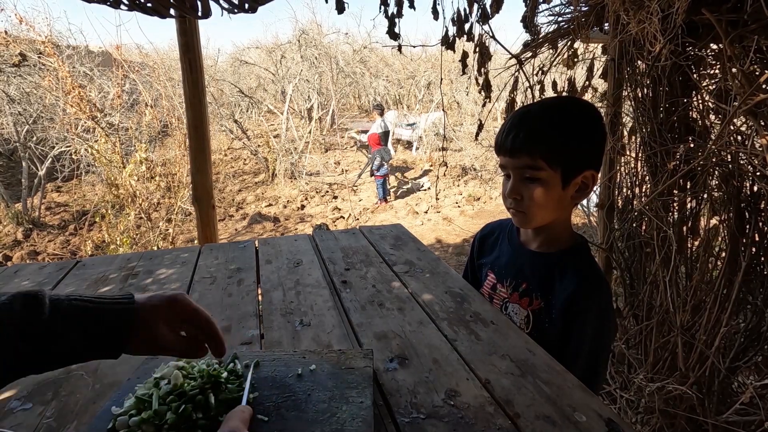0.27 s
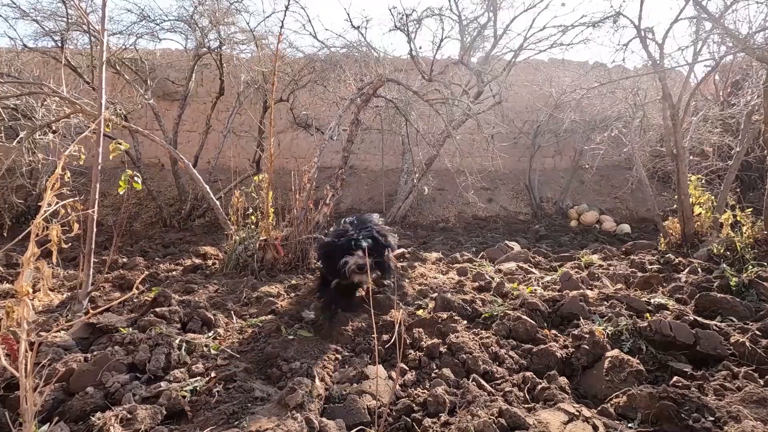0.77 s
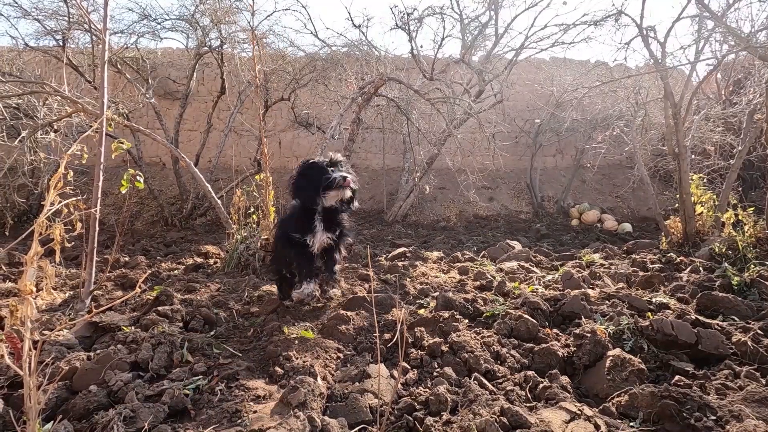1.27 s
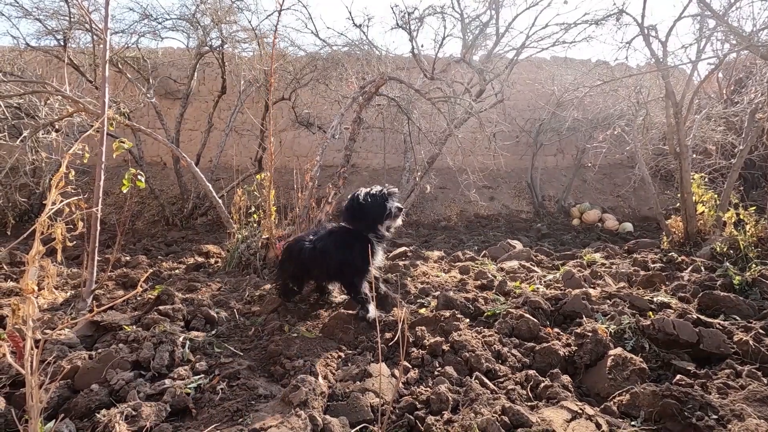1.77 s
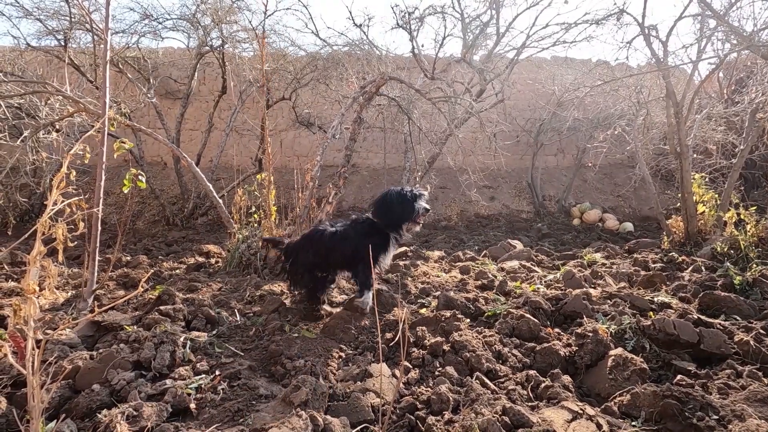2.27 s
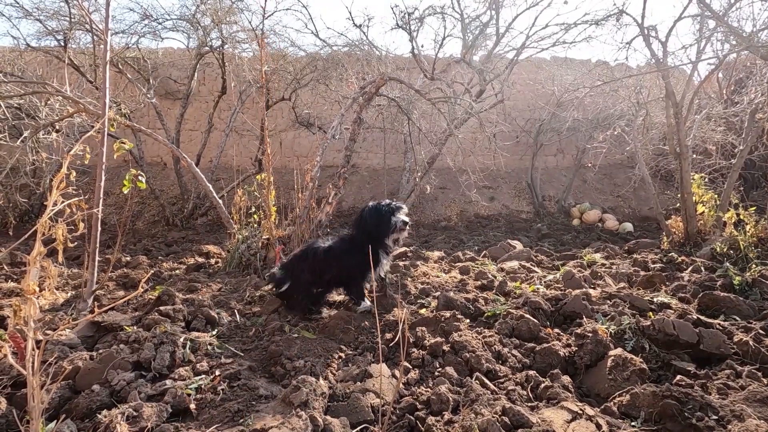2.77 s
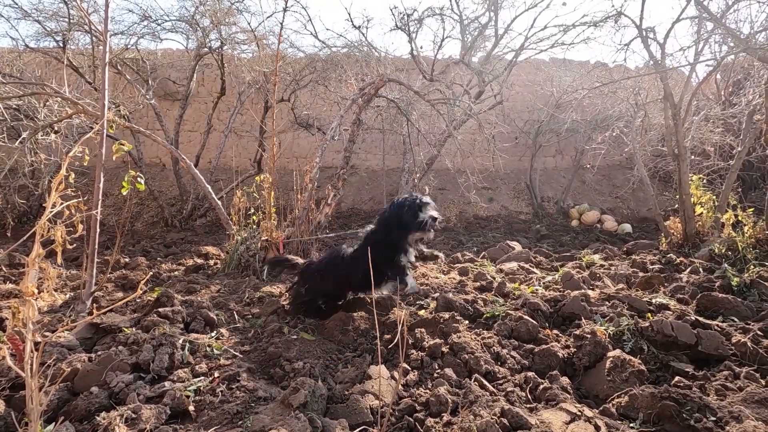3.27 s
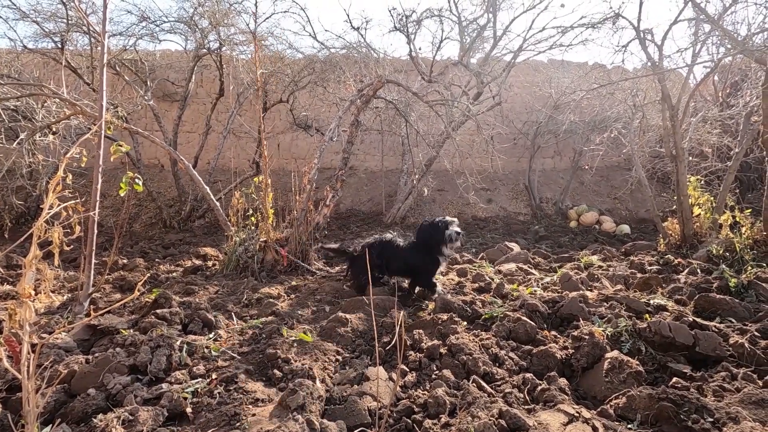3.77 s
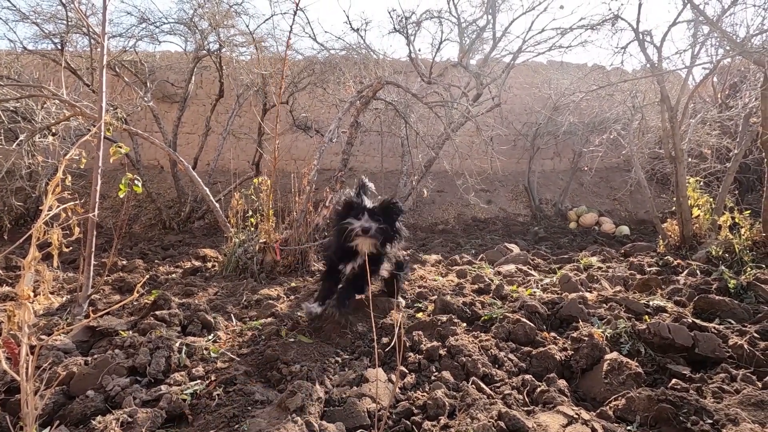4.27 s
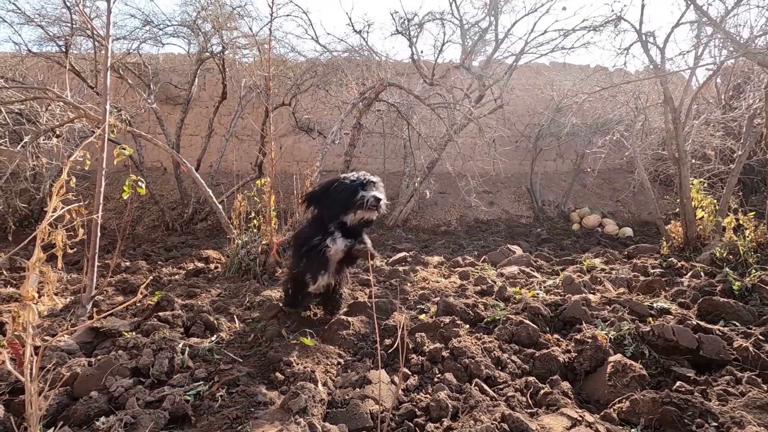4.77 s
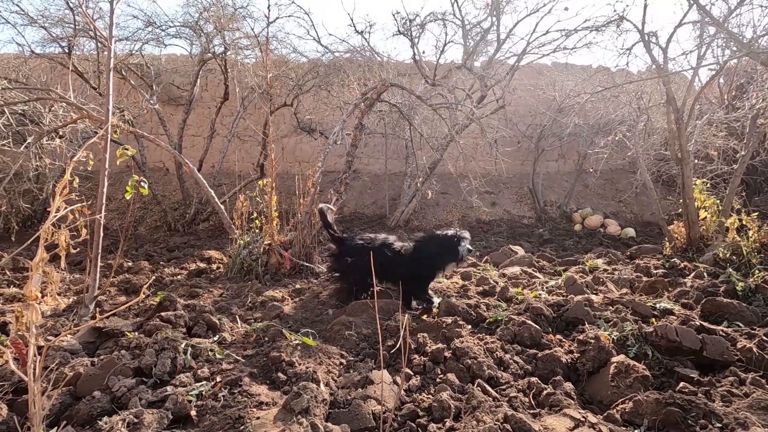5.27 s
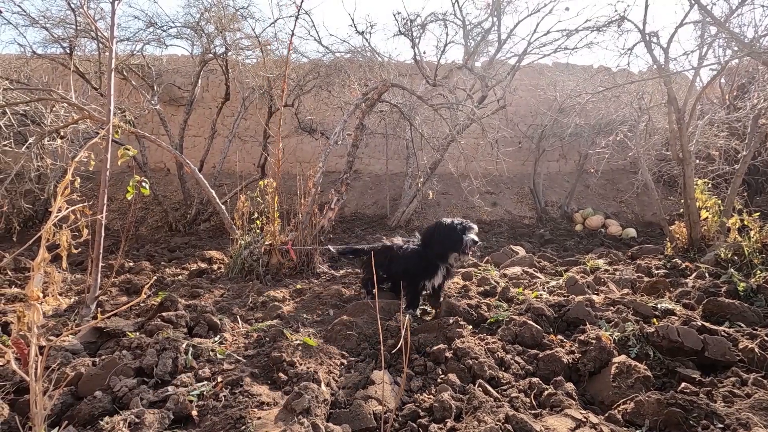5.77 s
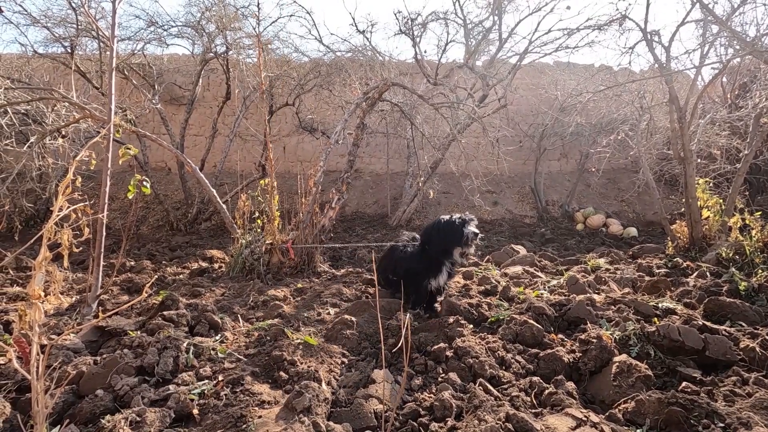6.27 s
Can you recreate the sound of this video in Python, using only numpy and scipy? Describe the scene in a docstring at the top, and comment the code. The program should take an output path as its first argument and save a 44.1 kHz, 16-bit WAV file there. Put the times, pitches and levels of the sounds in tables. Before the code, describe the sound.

Soft knife knocks and a short scrape in rumbling wind, a cut to silence, then a little dog whining, panting and yelping in short cries.

```python
"""In the wind outdoors a knife is laid on a cutting board: noise blows and a grainy slide ring its modes.
After a short silence, in a walled orchard, a small leashed dog whines, yips and pants: gliding partials
filtered by the mouth, sine whistles and hoots, grumbling pulses, a low decaying growl, and noise shaped
by throat and teeth. A dying noise response gives a faint echo; ticks are short noise decays; wind
rumbling on the microphone ports and the orchard's rustle are coloured noise."""
import sys
import numpy as np
from scipy import signal
from scipy.fft import rfft, irfft
from scipy.io import wavfile
from scipy.ndimage import uniform_filter1d

SR = 44100
rng = np.random.default_rng(int(sys.argv[2]) if len(sys.argv) > 2 else 0)


def waveform_to_disk(signal):
    """Save audio, clipped to [-1, 1], as 16-bit WAV at the path in sys.argv[1]."""
    frames = np.transpose(np.atleast_2d(signal))
    scaled = np.clip(frames, -1, 1) * 32767
    samples = np.round(scaled).astype(np.int16)
    wavfile.write(sys.argv[1], SR, samples)


N = 287532

CUTOFF_HZ = 15600
# Wind strength, one track for the knife and one for the dog. Each row: time in seconds, level in dB.
WIND = [
    [(0, -51), (.3, -44.5), (.752, -47)],
    [(.83, -86.5), (1.1, -69), (1.7, -66.5), (2.5, -64), (3.1, -54.5), (3.3, -57.5), (3.7, -68),
     (3.85, -53.5), (4.1, -60.5), (4.7, -51), (5.1, -54.5), (5.5, -51), (6.52, -55)],
]


def amp(db):
    """Decibel law: the amplitude ratio of a level in dB."""
    return 10 ** (np.asarray(db) / 20)


def rms_one(x):
    """Power normalisation: the whole array is scaled to a joint rms of 1."""
    return x / np.sqrt(np.mean(x ** 2) + 1e-20)


def in_time(rows):
    """Linear interpolation: each column after the time becomes one value per sample."""
    s, *columns = np.transpose(rows)
    return [np.interp(np.arange(N) / SR, s, c) for c in columns]


def at_hz(points, hz):
    """Spectral envelope: levels in dB interpolated along logarithmic frequency."""
    points = np.array(points)
    return np.interp(np.log(hz), np.log(points[:, 0]), points[:, 1])


def gate(start, stop, edge_s):
    """Time window: one between the two times, with linear ramps outside."""
    return np.interp(np.arange(N) / SR, [start - edge_s, start, stop, stop + edge_s], [0, 1, 1, 0])


def drift(rate, count=1):
    """Random modulation: noise through a double low-pass pole at the rate in Hz, scaled to a joint rms of 1."""
    r = np.exp(-2 * np.pi * rate / SR)
    noise = rng.standard_normal((count, N + SR))
    return rms_one(signal.lfilter([1], [1, -2 * r, r * r], noise))[:, SR:]


def resonate(x, hz, width):
    """Damped resonance: a two-pole filter of about unit peak gain, its width in Hz."""
    r = np.exp(-np.pi * width / SR)
    poles = [1, -2 * r * np.cos(2 * np.pi * hz / SR), r * r]
    return signal.lfilter([(1 - r * r) / 2, 0, (r * r - 1) / 2], poles, x)


def coloured(spectrum, count):
    """Spectral shaping: white noise weighted by a spectrum, with a joint rms of 1."""
    hz = np.maximum(np.fft.rfftfreq(N, 1 / SR), 1)
    white = rfft(rng.standard_normal((count, N)))
    return rms_one(irfft(white * amp(at_hz(spectrum, hz)), N))


def spread(pair, side_db):
    """Mid-side stereo: the side signal enters left and right with opposite signs."""
    return pair[0] + amp(side_db) * pair[1] * [[1], [-1]]


def bursts(events, length_s):
    """Impulsive excitation: each event starts noise that decays by 1/e in the given length."""
    out, t = np.zeros(N), np.arange(int(0.016 * SR)) / SR
    noise = rng.standard_normal((len(events), len(t)))
    for row, burst in zip(events, noise):
        at = int(row[0] * SR)
        out[at:at + len(t)] += amp(row[1]) * burst * np.exp(-t / length_s)
    return out


def glide(rows, waver, edge_s):
    """Frequency modulation: phase integrates a smoothed, wavering pitch; edges and other columns follow."""
    s, hz, *columns = np.transpose(rows)
    a, b = int((s[0] - edge_s) * SR), int((s[-1] + edge_s) * SR)
    t = np.arange(a, b) / SR
    pitch = uniform_filter1d(np.interp(t, s, hz), size=300) * (1 + waver[a:b])
    phase = 2 * np.pi * np.cumsum(pitch) / SR
    edge = np.interp(t, [t[0], s[0], s[-1], t[-1]], [0, 1, 1, 0]) ** 2
    return slice(a, b), pitch, phase, edge, [np.interp(t, s, c) for c in columns]


def cries():
    """Source and filter: 16 harmonics take the colour of nose, mouth and tongue; also returns the level."""
    # Voice tracks. Each row: time in seconds, pitch in Hz, level in dB, mouth opening from 0 to 1.
    cry_tracks = [
        [(0.85, 1200, -65.5, 0.24), (0.871, 1223, -52.5, 0.24), (0.886, 1157, -59.5, 0.3),
         (0.896, 1130, -68, 0)],
        [(1.028, 865, -45.5, 0.51), (1.052, 848, -43, 0.31), (1.073, 900, -47, 0.51), (1.087, 974, -57.5, .1)],
        [(1.302, 1493, -54, 1), (1.31, 1340, -43.5, 0.72), (1.323, 1331, -43, 0.86), (1.344, 1273, -54, 0.8),
         (1.354, 1270, -56, 0)],
        [(1.706, 1610, -51.5, 0.4), (1.714, 1477, -40.5, 0.47), (1.729, 1274, -41.5, 0.6),
         (1.75, 1226, -45.5, 0), (1.761, 1090, -53, .1)],
        [(1.842, 584, -51.5, 0), (1.86, 639, -39.5, 0), (1.877, 536, -60, 0.12), (1.904, 485, -65, 0.15)],
        [(2.128, 619, -63, 0.04), (2.158, 536, -54, 0.05), (2.169, 470, -66, 0.25), (2.191, 423, -65, 0.06)],
        [(2.592, 892, -48.5, 0.51), (2.615, 1030, -39, 0.54), (2.631, 1047, -48, 0.87),
         (2.653, 963, -43.5, 0.16), (2.676, 990, -41, 0.48), (2.695, 922, -41.5, 0.13),
         (2.77, 1047, -43.5, 0.5), (2.835, 1068, -40, 0.5), (2.884, 1050, -37.5, 0.54), (2.897, 1004, -39, 0.5)],
        [(3.089, 633, -16, 0.56), (3.11, 626, -15.5, 0.7), (3.129, 739, -16, 0.83), (3.149, 778, -16, 0.6),
         (3.165, 767.4, -13, 0.76), (3.177, 783, -22, 0.6), (3.191, 787, -30.5, 0.01)],
        [(3.523, 1326, -25.5, 0.52), (3.533, 1005, -25.5, 1), (3.55, 1038, -19, 1), (3.568, 1249, -19.5, 0.99),
         (3.592, 1175, -26.5, 0.9), (3.611, 940, -39, 0.5), (3.619, 960, -40.5, 0.75)],
        [(3.797, 1128, -34.5, 0.66), (3.812, 849, -33.5, 0.75), (3.819, 1002, -22.5, 1),
         (3.83, 1149, -19.5, 0.9), (3.843, 1183, -17.5, 0.75), (3.86, 1116, -25.5, 0.52),
         (3.876, 905, -35.5, 0.62)],
        [(4.117, 809, -35.5, 0.44), (4.135, 815, -34.5, 0.37), (4.149, 991, -38.5, 0.54),
         (4.17, 925, -28.5, 0.85), (4.177, 947, -42.5, 0.24)],
        [(4.349, 1181, -29.5, 0.83), (4.357, 1208, -22, 0.64), (4.391, 1297, -16.5, 0.56),
         (4.399, 1225, -23.5, 0.52), (4.424, 1145, -32.5, 0.4)],
        [(4.427, 796, -40.5, .3), (4.445, 766, -41, 0.5)],
        [(4.449, 1076, -30.5, 0.47), (4.466, 1107, -37.5, 0.48), (4.481, 1008, -35.5, 0.45),
         (4.493, 1070, -32.5, 0.02), (4.512, 1048, -30.5, 0.44), (4.535, 923, -44, 0.13)],
        [(4.707, 1205, -38.5, 0.26), (4.725, 1086, -36.5, 0.5), (4.74, 1177, -32.5, 0.66),
         (4.756, 1116, -32.5, 0.41), (4.776, 1104, -30, 0.37), (4.809, 986, -33, 0.2), (4.821, 909, -41, 0)],
        [(4.952, 1212, -23, 0.4), (4.97, 1224, -17.5, 0.68), (4.982, 1115, -21, 0.88), (4.994, 1083, -15, 0.98),
         (5.009, 997, -25, 0.46), (5.017, 922, -30.5, 0.56)],
        [(5.205, 1200, -19.5, .3), (5.229, 1169, -16, 0.46), (5.241, 1034, -24, 0.29),
         (5.255, 1006, -25.5, 0.51), (5.262, 970, -36, 0.1)],
        [(5.267, 650, -33.5, 0.13), (5.274, 607, -35.5, 0.36), (5.287, 537, -51, 0.3)],
        [(5.425, 661.5, -37.5, 0.54), (5.437, 698.5, -31.5, 0.33), (5.457, 708, -27, 0.46),
         (5.469, 736, -26.5, 0.27), (5.479, 783.5, -30, 0.21), (5.49, 666, -29, 0.62)],
        [(5.494, 508, -36, 0.13), (5.504, 528, -45.5, 0.13), (5.524, 525, -45.5, 0)],
        [(6.121, 796, -39, 0.07), (6.129, 740, -35, 0.43), (6.142, 840, -33, 0.34), (6.167, 793, -29, 0.21),
         (6.187, 881, -34, 0.33), (6.206, 1011, -31.5, 0.22), (6.311, 1053, -31, .1),
         (6.319, 1011, -32.5, 0.55), (6.329, 986, -46, 0.1)],
    ]
    # Colour of each cry. Each row: start of darkening in Hz, loss half an octave higher in dB (negative
    # brightens), tongue resonance at the start in Hz, at the end in Hz, its gain in dB.
    cry_colours = [(3700, 15, 3600, 3500, 9.5), (2000, 7.5, 1330, 4000, 11), (5700, -15, 2300, 4900, 7.5),
                   (1800, 6.5, 3600, 4500, 9), (1150, 35, 1800, 1200, 18), (1370, 23, 1200, 1600, 2),
                   (1485, 8, 2100, 5600, 6), (5600, 16.5, 1100, 4030, 13), (3900, 11.5, 3080, 3200, 3.5),
                   (3240, 15.5, 3900, 1400, 5), (2900, 12.5, 1620, 1700, 16.5), (3800, 12.5, 3240, 1800, 3),
                   (1000, 23.5, 1900, 1600, 9), (1518, 0.5, 6400, 3300, 10.5), (1500, 1.5, 1720, 5900, 5),
                   (3700, 14, 3920, 1790, 8.5), (3630, 31, 3100, 2900, 6.5), (1317, 21, 1700, 1150, 5.5),
                   (4180, 23.5, 2220, 3400, -3), (1600, 23, 1550, 1590, 17), (4610, 11, 1295, 5800, 13.5)]
    # Gain through the nose alone. Each row: frequency in Hz, relative level in dB.
    shut_mouth = [(450, -1), (1250, 4), (2100, -17.5), (3100, -16), (4200, -8.5), (6000, 2.5), (8000, -6),
                  (11000, -13.5), (15000, -37)]
    # Gain through the wide open mouth. Each row: frequency in Hz, relative level in dB.
    open_mouth = [(620, -28.5), (780, -15), (1250, 6), (1700, 6), (2300, 4.5), (3100, 3.5), (3900, -4.5),
                  (5000, -19.5), (8000, -34), (11000, -49.5), (15000, -56.5)]
    shut_overtones_db = -17.5  # with the mouth shut, overtones shift by this against the first partial
    tongue_octaves = 0.25
    out, level = np.zeros(N), np.zeros(N)
    waver = .0025 * drift(90)[0]
    shimmer_db = .9 * drift(90, count=16) + .6 * drift(15, count=16)
    k = np.arange(1, 17)[:, None]
    for rows, (dark_hz, dark_db, from_hz, to_hz, tongue_db) in zip(cry_tracks, cry_colours):
        span, pitch, phase, edge, (db, opening) = glide(rows, waver, edge_s=0.0035)
        opening = np.clip(opening, 0, 1)
        hz = k * pitch
        nose_db = at_hz(shut_mouth, hz) + shut_overtones_db * (k > 1)
        colour_db = (1 - opening) * nose_db + opening * at_hz(open_mouth, hz)
        tongue_hz = np.geomspace(from_hz, to_hz, len(pitch))
        colour_db = colour_db + tongue_db * np.exp(-(np.log2(hz / tongue_hz) / tongue_octaves) ** 2)
        colour_db = colour_db - dark_db * np.clip(2 * np.log2(hz / dark_hz), 0, 1)
        share = amp(colour_db) * (hz < CUTOFF_HZ)
        share = share / np.sqrt(np.sum(share ** 2, axis=0))
        share = share * amp(np.sqrt(k) * shimmer_db[:, span])  # higher partials flicker more
        partials = share * np.sin(k * phase + .6 * k * k)  # spread phases: no sharp pulse
        out[span] += np.sqrt(2) * edge * amp(db) * np.sum(partials, axis=0)
        level[span] += edge * amp(db)
    return out, level


def panting(cry_level):
    """Turbulence noise: air flow drives throat and teeth resonances, the treble wider in stereo."""
    # Breaths. Each row: peak time in seconds, rise in seconds, fall in seconds, throat noise in dB,
    # sibilance in dB above the throat noise.
    breaths = [(.955, 0.028, 0.069, -81.5, -8), (1.16, 0.051, 0.044, -83, 2), (1.57, 0.052, 0.037, -78, -7),
               (6.029, 0.11, .08, -77.5, -15), (6.26, 0.11, 0.11, -68.5, 13.5),
               (2.75, 0.1, .15, -81.5, 8.5), (.918, .05, 0.026, -72, -7), (1.032, 0.034, 0.035, -59, -24),
               (1.1, 0.03, .035, -65.5, -6.5), (1.25, .12, 0.36, -77, -4), (1.467, 0.11, .035, -75.5, -3),
               (1.716, 0.14, 0.39, -70, -5), (2.012, 0.048, .05, -52.5, -22),
               (2.185, 0.23, 0.11, -74.5, -20), (2.304, 0.055, 0.09, -57.5, -26),
               (2.906, 0.12, 0.11, -66, -3), (3.005, 0.08, 0.13, -64, -22.5),
               (3.096, 0.019, 0.034, -24, -41.5), (3.192, 0.038, 0.055, -48.5, -11),
               (3.266, 0.08, 0.039, -41, -28), (3.36, 0.27, 0.13, -59.5, -20),
               (3.455, 0.057, 0.064, -52, -37), (3.523, 0.015, 0.025, -53, -31),
               (3.612, 0.11, 0.076, -49.5, -13.5), (3.7, 0.13, 0.24, -67, -14),
               (3.85, 0.025, 0.23, -53, -16), (3.928, .12, 0.042, -42.5, -21.5),
               (4.059, 0.035, 0.087, -66, 2.5), (4.196, 0.069, .035, -45.5, -16.5),
               (4.274, 0.088, 0.22, -61, -11), (4.426, 0.069, 0.18, -51.5, -3),
               (4.654, 0.033, 0.03, -66, -4), (4.787, 0.14, 0.081, -59.5, 8.5),
               (4.899, 0.19, 0.059, -70, -6), (5.017, 0.084, 0.058, -39, -14),
               (5.101, 0.032, 0.12, -68, -9.5), (5.287, 0.11, 0.046, -40, -14.5),
               (5.365, .06, 0.052, -58.5, -22), (5.47, 0.031, .1, -37.5, -15),
               (5.531, .1, 0.071, -35.5, -21.5), (5.605, 0.0091, 0.061, -55.5, -11.5),
               (5.735, 0.16, 0.062, -62, -12), (5.836, 0.05, 0.08, -46, -21),
               (6.168, 0.059, 0.063, -41, -13), (6.35, 0.067, 0.021, -50.5, -11),
               (6.46, 0.14, 0.07, -50, -28)]
    # Throat resonances. Each row: frequency in Hz, width of the first of two passes in Hz, gain in dB.
    throat_modes = [(720, 300, -13), (1330, 260, -6), (2200, 450, 0), (3150, 600, -4), (4800, 800, -15)]
    # Teeth resonances. Each row: frequency in Hz, width of each of two passes in Hz, mean gain in dB.
    teeth_modes = [(5950, 3000, 5.5), (10780, 3200, -5.5)]
    drop_db, roundness = 30, 1.394  # loss over the rise or fall time; 1 = pointed, 2 = rounded
    t = np.arange(N) / SR
    # air that leaks with every cry, below its level
    in_throat, at_teeth = amp(-48.5) * cry_level, amp(-42.5) * cry_level
    for s, rise, fall, db, hiss_db in breaths:
        span = slice(max(int((s - 3 * rise) * SR), 0), int((s + 3 * fall) * SR))
        away = np.where(t[span] < s, (s - t[span]) / rise, (t[span] - s) / fall)
        flow = amp(db - drop_db * away ** roundness)
        in_throat[span] += flow
        at_teeth[span] += amp(hiss_db) * flow
    flutter = amp(2.0 * drift(60)[0])
    white = rng.standard_normal((2, 2, N))
    throat, teeth = 0, 0
    for k, (hz, width, db) in enumerate(throat_modes):
        throat = throat + (-1) ** k * amp(db) * resonate(resonate(white[0], hz, width), hz, 2 * width)
    throat = signal.sosfilt(signal.butter(2, [450, 5000], "band", fs=SR, output="sos"), throat)
    for k, (hz, width, db) in enumerate(teeth_modes):
        gain = amp(db + 2.0 * drift(11)[0])
        teeth = teeth + (-1) ** k * gain * resonate(resonate(white[1], hz, width), hz, width)
    throat, teeth = spread(rms_one(throat), side_db=-18), spread(rms_one(teeth), side_db=-4)
    return flutter * (in_throat * throat + at_teeth * teeth * amp([[1.2], [-1.2]]))


def grumbles():
    """Pulse excitation: randomly timed throat pulses with some air ring the chest resonances."""
    # Grumble strength. Each row: time in seconds, level in dB.
    grumble_tracks = [
        [(1.63, -58), (1.645, -46.5), (1.69, -61.5), (1.79, -55.5), (1.86, -65)],
        [(2.555, -61), (2.59, -57)],
        [(3.885, -50.5), (3.95, -73)],
        [(6.338, -51.5), (6.36, -50.5)],
    ]
    # Chest resonances. Each row: frequency in Hz, width in Hz, relative gain in dB.
    chest = [(204, 76, 2), (580, 96, 1), (870, 91, 9)]
    pulses = (rng.random(N) < 260 / SR) * rng.standard_normal(N)  # on average 260 a second
    pulses = pulses + .05 * rng.standard_normal(N)
    pulses = signal.lfilter([1], [1, -.85], pulses)  # soft contact of the folds
    body = sum((-1) ** k * amp(db) * resonate(pulses, hz, w) for k, (hz, w, db) in enumerate(chest))
    level = sum(amp(in_time(rows)[0]) * gate(rows[0][0], rows[-1][0], .01) for rows in grumble_tracks)
    return rms_one(body) * level


def growls():
    """Damped oscillation: a low throat growl at about 130 Hz, decaying, with a second partial."""
    # Each row: start in seconds, relative level in dB, first partial in Hz.
    growl_rows = [(3.199, -35, 128.6)]
    out, t = np.zeros(N), np.arange(int(.12 * SR)) / SR
    for s, db, hz in growl_rows:
        tone = np.sin(2 * np.pi * hz * t) + 0.49 * np.sin(2 * np.pi * 2.05 * hz * t)
        envelope = (t / 0.0047) * np.exp(1 - t / 0.0079)
        out[int(s * SR):int(s * SR) + len(t)] += amp(db) * tone * envelope
    return out


def pure(tracks, waver, shimmer_db, edge_s):
    """Pure tones: one sine follows each track of time in seconds, pitch in Hz and level in dB."""
    out, wobble, shimmer = np.zeros(N), waver * drift(99)[0], amp(shimmer_db * drift(48)[0])
    for rows in tracks:
        span, _, phase, edge, (db,) = glide(rows, wobble, edge_s)
        out[span] += np.sqrt(2) * edge * amp(db) * shimmer[span] * np.sin(phase)
    return out


def whistles():
    """Nasal whistle tones: each sine glides straight and swells to its middle before fading."""
    # Each row: start in seconds, length in seconds, first pitch in Hz, last pitch in Hz, mid level in dB.
    whistle_rows = [(0.869, 0.058, 8060, 8840, -65), (1.084, .016, 8740, 8800, -61.5),
                    (1.279, 0.032, 8730, 8330, -51), (1.347, 0.05, 8950, 8500, -59),
                    (1.373, 0.097, 8940, 8430, -58), (1.683, 0.016, 9600, 9600, -63.5),
                    (1.741, 0.063, 9700, 9040, -64), (4.41, .04, 9330, 8850, -39.5),
                    (4.701, 0.01, 9150, 9250, -36), (4.819, 0.011, 9300, 9100, -51.5),
                    (4.928, 0.044, 7860, 8270, -40.5), (2.893, 0.027, 8900, 8600, -63),
                    (3.305, 0.027, 8840, 9000, -69), (5.194, .02, 8230, 8500, -54.5)]
    tracks = []
    for s, length, a, b, db in whistle_rows:
        middle = (s + length / 2, (a + b) / 2, db)
        tracks.append([(s, a, db - 21.5), middle, (s + length, b, db - 19.5)])
    return pure(tracks, waver=0.0026, shimmer_db=4.5, edge_s=.0036)


def soft_hoots():
    """Pure tones without overtones: gentle low sines that glide and waver."""
    # Each row: time in seconds, pitch in Hz, level in dB.
    hoot_tracks = [
        [(5.111, 374, -69), (5.135, 402, -78), (5.168, 457, -64), (5.196, 487, -62), (5.284, 421, -56.5)],
        [(5.641, 443, -52), (5.672, 471, -40), (5.759, 576, -43.5), (5.831, 561, -53.5), (5.874, 503, -62)],
    ]
    return pure(hoot_tracks, waver=0.0052, shimmer_db=0.9, edge_s=.012)


def yard(x):
    """Diffuse reverberation: wall and tree scatter as convolution with dying, dulled noise."""
    t60_s, wall_cut_hz = 0.42, 3200
    t = np.arange(int(.6 * SR)) / SR
    response = rng.standard_normal((2, len(t))) * amp(-60 * t / t60_s) * (t > .012)
    response = signal.sosfilt(signal.butter(1, wall_cut_hz, fs=SR, output="sos"), response)
    response = response / np.sqrt(np.sum(response[0] ** 2))
    return spread(signal.fftconvolve(x[None], response, axes=1)[:, :N], side_db=-12)


def knife():
    """Modal excitation: noise blows and a grainy slide ring the same board, some force heard direct."""
    # Blade blows. Each row: start in seconds, drive level in dB.
    blows = [(0.2, -50), (0.735, -47.5)]
    # Board modes. Each row: frequency in Hz, relative gain in dB, 60 dB decay time in seconds.
    board = [(1120, 0, .02), (2300, -4, .008), (2950, -3, .012), (5100, -12, .005)]
    # Blade sliding. Each row: time in seconds, drive level in dB.
    slide_track = [(.235, -66), (.3, -62), (.37, -70), (.44, -72), (0.749, -88)]
    grains = rms_one(rng.standard_normal(N) * amp(2.0 * drift(140)[0]))
    slide = amp(in_time(slide_track)[0]) * grains * gate(slide_track[0][0], slide_track[-1][0], 0.0033)
    force = bursts(blows, 0.0046) + slide
    ringing = sum(amp(db) * resonate(force, hz, np.log(1000) / np.pi / t60) for hz, db, t60 in board)
    return amp(9) * ringing + amp(-12) * force


def ticks():
    """Hard contact: leash clip and twigs give a very short bright burst and a longer resonant body."""
    # Each row: start in seconds, bright drive level in dB, body drive in dB above it.
    contacts = [(1.459, -60, 13), (1.4698, -66, 13.5), (4.053, -44.5, 1), (4.2574, -60, 6),
                (4.3148, -60, 8), (4.598, -62.5, 22), (4.6445, -57.5, 19), (4.685, -59.5, 17),
                (4.89, -57.5, 6), (4.903, -63, 25), (5.598, -62, 23), (5.605, -43, 6), (5.718, -63, 19.5),
                (6.341, -47, 18)]
    body = bursts([(s, db + body_db) for s, db, body_db in contacts], 0.006)
    return resonate(bursts(contacts, 0.0012), 6000, 9000) + resonate(body, 1300, 600)


def wind():
    """Flow noise: lumpy low-frequency rumble on the microphone ports, a little of it their own."""
    # Each row: frequency in Hz, relative level in dB per Hz.
    wind_colour = [(12, -21.5), (20, 3), (41, -4), (138, -17), (209, -20.5), (715, -48), (1500, -74.5)]
    level = sum(amp(in_time(rows)[0]) * gate(rows[0][0], rows[-1][0], 0.0012) for rows in WIND)
    lumps = amp(2.26 * drift(30)[0])
    return level * lumps * spread(coloured(wind_colour, count=2), side_db=-17.5)


def ambience():
    """Diffuse background field: wide coloured noise for the far rustle of the orchard."""
    # Each row: frequency in Hz, relative level in dB per Hz.
    rustle_colour = [(180, -8), (300, 1), (681, -21), (1280, -8.5), (1760, -19), (2940, -30.5),
                     (4400, -23.5), (9500, -26), (14000, -47.5)]
    # Each row: time in seconds, level in dB.
    rustle_track = [(0, -73.5), (.752, -68.5), (.76, -130), (.82, -130), (1.0, -94.5), (2.5, -82),
                    (4.0, -83.5), (6.52, -70.5)]
    level = amp(in_time(rustle_track)[0] + 0.64 * drift(4)[0])
    return level * spread(coloured(rustle_colour, count=2), side_db=-3.0)


def scene():
    """Superposition: the dog and its echo, contacts, the knife on its board, wind and rustle add up."""
    cry, cry_level = cries()
    voice = cry + grumbles()
    hoots = soft_hoots()
    # a bounce off the near ground, from one side
    sideways = amp(-26.5) * np.roll(voice, int(.0015 * SR)) * [[1], [-1]]
    dog = voice * amp([[-.4], [.4]]) + sideways
    dog = dog + whistles() * amp([[1.1], [-1.1]]) + hoots + panting(cry_level)
    echo = amp(-29) * yard(voice + hoots)
    table = knife() * gate(0, WIND[0][-1][0], .004)  # ends with the first wind
    return dog + echo + growls() + ticks() + table + wind() + ambience()


def record(dry):
    """Band limitation: a steep low-pass is 70 dB down from the cutoff upward."""
    return signal.sosfilt(signal.cheby2(12, 70, CUTOFF_HZ, fs=SR, output="sos"), dry)


dry = scene()
out = record(dry)
waveform_to_disk(out)
```